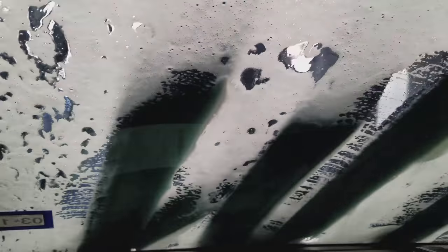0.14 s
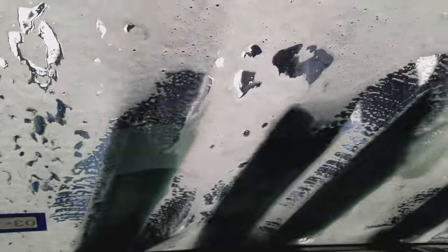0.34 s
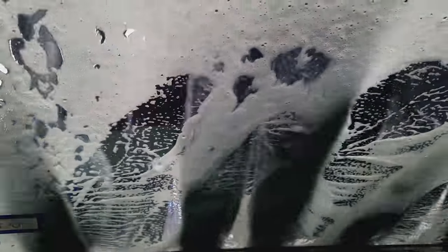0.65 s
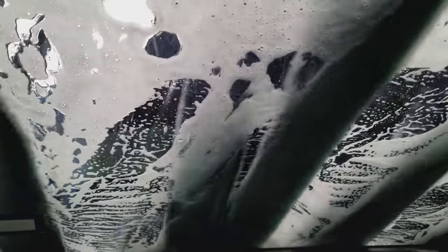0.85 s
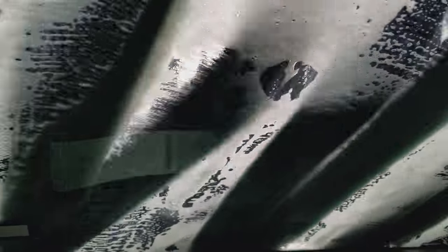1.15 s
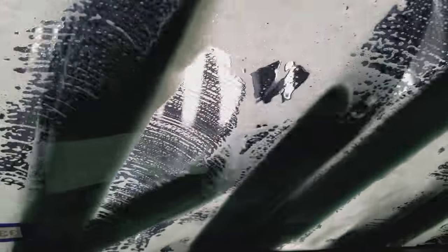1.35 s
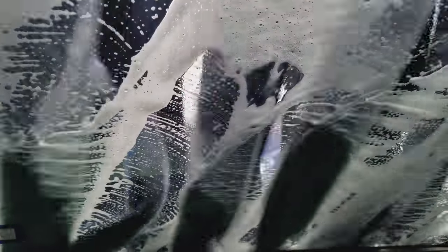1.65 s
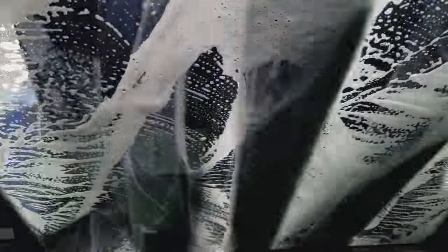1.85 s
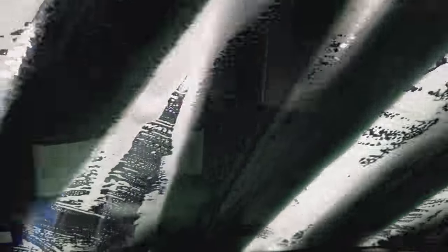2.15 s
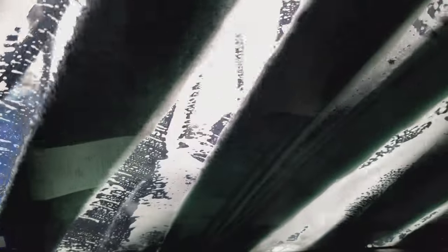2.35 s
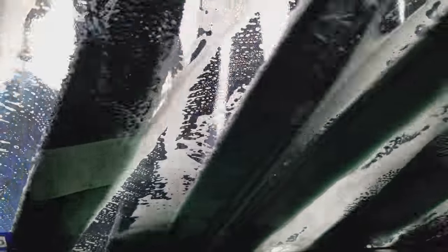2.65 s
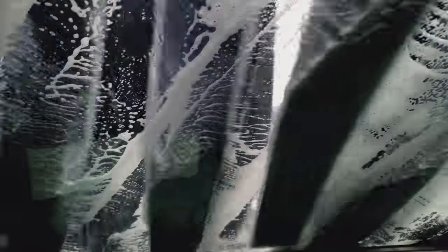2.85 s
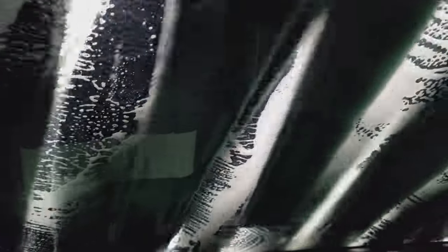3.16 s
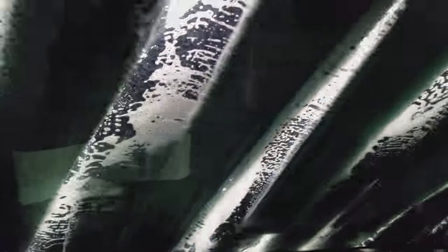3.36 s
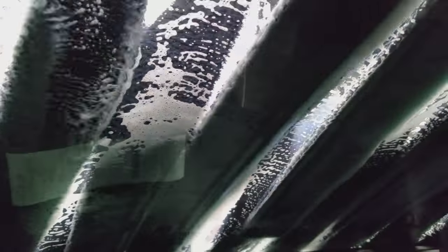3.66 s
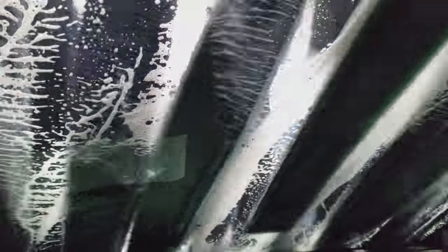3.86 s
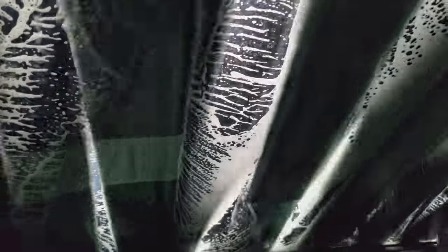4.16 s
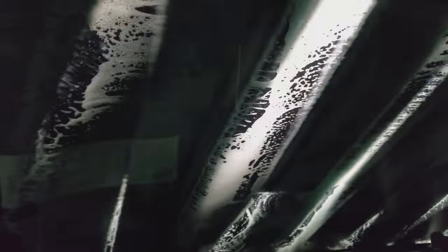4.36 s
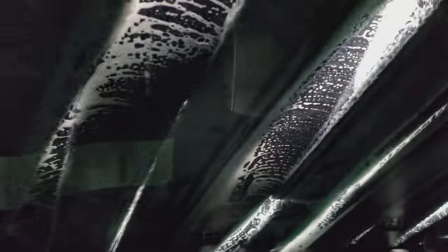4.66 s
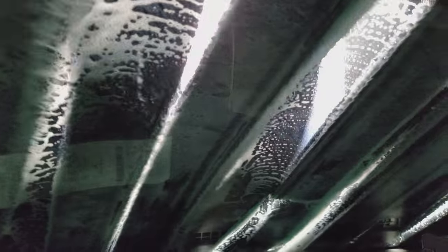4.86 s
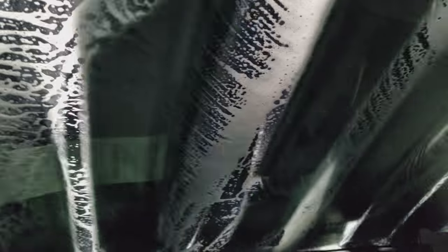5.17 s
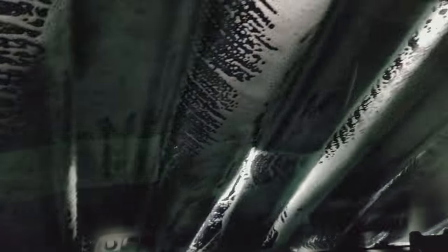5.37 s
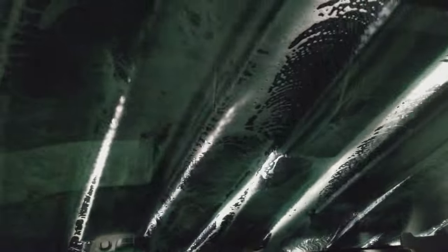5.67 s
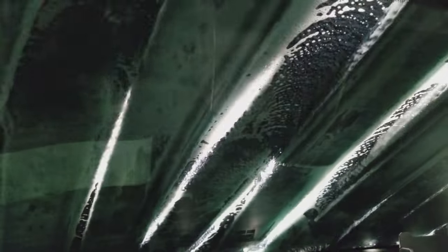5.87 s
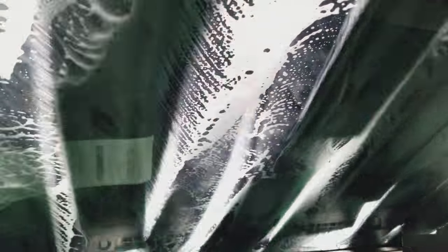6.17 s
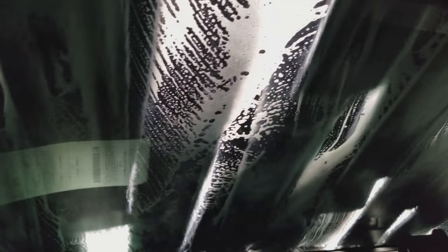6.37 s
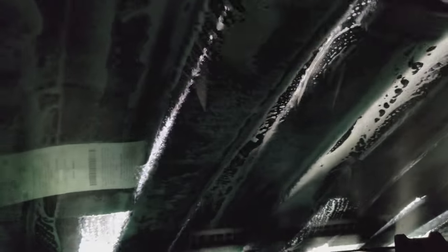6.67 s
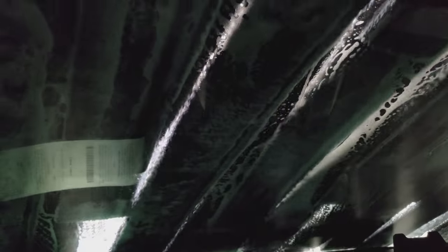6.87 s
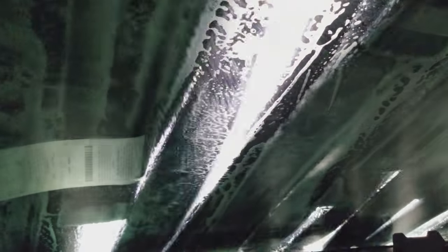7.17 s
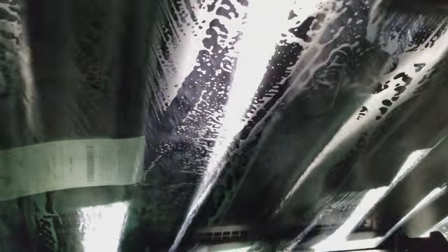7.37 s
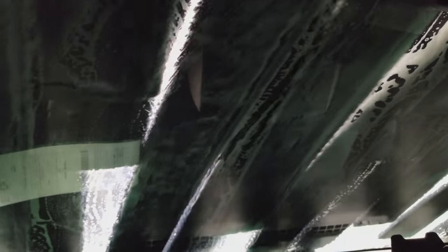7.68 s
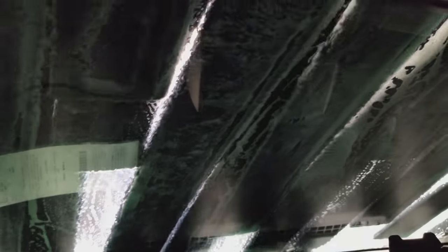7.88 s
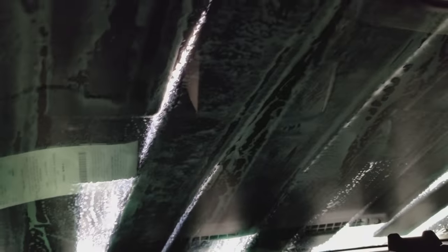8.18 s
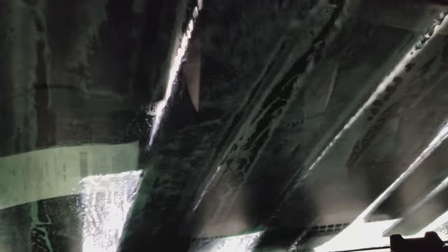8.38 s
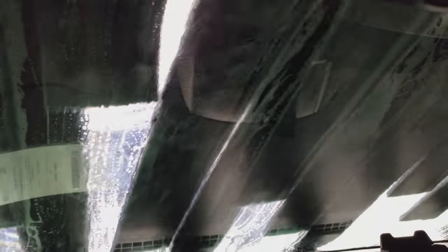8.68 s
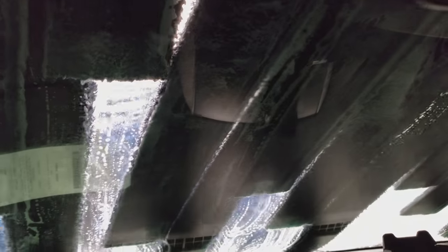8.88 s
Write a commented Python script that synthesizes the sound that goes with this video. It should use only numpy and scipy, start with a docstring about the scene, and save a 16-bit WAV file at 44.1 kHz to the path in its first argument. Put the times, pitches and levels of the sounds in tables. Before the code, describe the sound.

The microphone sits inside a small closed car while an automatic wash works over it for nine seconds. At once heavy wet cloth slaps thud on the roof, deep and dull, at 0.2 and 0.6 s, with lighter blows following. Soft pats drum throughout, over a low cabin rumble, quiet spray and fizzing foam; short watery hisses splash the glass and a few tiny drops tick. A faint, wavering whine near 1 kHz comes and goes until about 3 s. Strong slaps land at 2.2, 2.9 and 4 s, with firmer raps on glass near 3 and 3.9 s. From 4 s cloth drags and scrubs more loudly on the glass, briefly dipping near 4.7 s, where a clear splash falls. Slaps cluster at 5.6-5.9 s; a hard one at 6.8 s precedes a faint squeak until 7 s. Rapid thumps around 7.9 s and booming blows at 8.7 and 8.9 s finish.

```python
"""Inside a closed car in an automatic wash, wet cloth strips swing against the body for nine seconds.
From the start heavy slaps ring the roof, light pats drum, foam fizzes and water splashes on the glass;
a thin whine near 1 kHz comes and goes for three seconds, and now and then a drop ticks or a strip end raps.
As the strips move from the bonnet onto the glass, cloth drags and scrubs louder from about four seconds.
A faint squeak passes near seven seconds; strong slaps fall to the end. Two ports hear it, the right first."""
import sys
import numpy as np
from scipy import signal
from scipy.fft import rfft, irfft, next_fast_len
from scipy.io import wavfile

SR = 44100
rng = np.random.default_rng(int(sys.argv[2]) if len(sys.argv) > 2 else 0)


def dump(signal):
    """Clip the signal to [-1, 1] and save it as 16-bit WAV at the path in sys.argv[1]."""
    limited = np.clip(np.atleast_2d(signal).T, -1, 1)
    pcm = np.round(limited * 32767).astype(np.int16)
    wavfile.write(sys.argv[1], SR, pcm)


N = 398663

# heavy slaps, levels before the two ports: [t/s, peak level/dB, centre f/Hz, glass level over peak/dB,
# contact fading time/s, unrolling rest level over peak/dB, cabin boom peak level/dB]
SLAP_EVENTS = [(.166, -8.5, 157, -16.5, 0.0093, -6, -25), (0.566, -11, 153, -23, 0.0075, 0, -21),
               (.62, -15.5, 150, -7, 0.0076, -9, -36), (.765, -18, 135, -15, 0.01, -4, -45.5),
               (0.859, -19.5, 130, -17, 0.014, -15, -50), (.997, -13, 131, -22, 0.011, -14.5, -31),
               (1.057, -21.5, 94, -28, 0.012, -13, -38), (1.322, -14.5, 90, -47, .0065, -4.5, -32),
               (1.65, -18, 85, 0.5, 0.024, -2.5, -19.5), (1.719, -14.5, 95, -1, 0.0087, -24, -23),
               (1.784, -27.5, 119, 7.5, 0.0057, -13, -29.5), (1.822, -16.5, 124, -26, 0.013, 1.5, -34),
               (2.249, -6.5, 199, -12, 0.02, -13.5, -18.5), (2.411, -11.5, 124, -16.5, 0.011, -6.5, -23),
               (2.632, -22, 109, -38, 0.0071, -18, -44), (2.848, -10.5, 131, -32, 0.012, -7, -27),
               (2.945, -6, 145, -6.5, 0.017, -12.5, -16.5), (3.286, -24, 127, -13, 0.011, 4, -43),
               (3.593, -12.5, 132, -10, 0.0047, -2.5, -31.5), (3.97, -8, 105, -29, 0.0047, -10, -23.5),
               (4.142, -12, 156, -37, 0.0058, -12, -34), (4.252, -27, 157, -50, 0.0077, -16, -42.5),
               (4.538, -13, 126, -25, .01, -2, -44), (5.159, -21.5, 90, -34, .01, -4.5, -16),
               (5.58, -5, 136, -12.5, 0.012, -8, -24.5), (5.634, -7, 106, -18, 0.014, -10.5, -33.5),
               (5.721, -6.5, 168, -15, 0.0074, -25.5, -34), (5.857, -10, 91, -22, 0.0055, -17, -44),
               (6.299, -18, 111, -22, .011, -21, -32), (6.6, -15.5, 150, -32, 0.0068, 3, -31.5),
               (6.762, -3.5, 128, -21, 0.01, -8, -25), (7.086, -10.5, 150, -32, .0066, -4.5, -39.5),
               (7.217, -15, 157, -7, 0.013, -19, -29), (7.38, -14.5, 150, -22, .01, -11.5, -31.5),
               (7.538, -19, 133, -4, .011, -6.5, -33), (7.746, -12.5, 147, -3.5, .01, -3, -23),
               (7.884, -5.5, 197, -9, .006, -6.5, -19.5), (7.908, -6.5, 189, -19, 0.0062, -9, -33.5),
               (7.99, -11, 158, -30, 0.011, -14.5, -19.5), (8.166, -7, 136, -12, 0.017, -8, -31),
               (8.339, -35, 153, -32, .012, -13, -27), (8.667, -3, 147, -10, 0.016, -10.5, -13),
               (8.747, -16, 90, -16, 0.014, -24.5, -44), (8.939, -3, 142.4, -13.5, 0.009, -7, -19)]
# ways each part of the car rings: [f/Hz, width/Hz, level/dB]
ROOF_MODES = [(77, 12.6, -3), (93.9, 20.6, 0), (127.9, 24, 1.5), (154.4, 18.8, 2.5), (188, 31.2, -3.5)]
GLASS_MODES = [(260.2, 50.7, -8), (282.5, 34, -2), (349.8, 65.3, -4.5), (401, 85.4, -7.5), (480, 132, -11),
               (656, 310, -17.5), (992, 320, -19.5)]
BONNET_MODES = [(752, 64, 10.5), (990, 70, 7), (1580, 31, 4.5), (1853, 80, -6), (2297, 130, -3),
                (2820, 100, -1), (3100, 150, -5), (3664, 150, -3)]
# ways the air in the cabin rings: [f/Hz, width/Hz, level/dB]
CABIN_MODES = [(26.2, 26, -9), (40, 4, -15.5), (50, 18, 7.5)]


def amp(db):
    """Turn decibels into gain."""
    return 10 ** (np.asarray(db) / 20)


def rms_one(x):
    """Scale to an rms strength of 1."""
    return x / np.sqrt(np.mean(x ** 2) + 1e-20)


def in_time(rows):
    """Join the points of a time table by straight lines, one value per sample for each column."""
    s, *columns = np.transpose(rows)
    return [np.interp(np.arange(N) / SR, s, column) for column in columns]


def at_hz(points, hz):
    """Read a table of frequency and value on a log-frequency axis."""
    table_hz, values = np.array(points).T
    return np.interp(np.log(hz + 1e-9), np.log(table_hz), values)


def drift(rate):
    """Slow random wandering of rms 1, changing about rate times a second."""
    step = 40   # samples between the slow values
    r = np.exp(-2 * np.pi * rate * step / SR)
    white = rng.standard_normal(N // step + 2002)
    slow = signal.lfilter([1], [1, -2 * r, r * r], white)[2000:]   # skip the filter's start
    return np.interp(np.arange(N) / step, np.arange(len(slow)), rms_one(slow))


def resonate(x, hz, width):
    """One resonance with gain 1 at its top; a narrower width (Hz) rings longer."""
    r = np.exp(-np.pi * width / SR)
    top = (1 - r * r) / 2
    return signal.lfilter([top, 0, -top], [1, -2 * r * np.cos(2 * np.pi * hz / SR), r * r], x + 1e-18)


def panel(x, modes, wander_db=0):
    """A panel rings in several modes of alternating sign; moving cloth damps now one, now another."""
    out = 0
    for k, (hz, width, level_db) in enumerate(modes):
        wander = wander_db * drift(8.2) if wander_db else 0
        out = out + (-1) ** k * amp(level_db + wander) * resonate(x, hz, width)
    return out


def burst(rise_s, decay_s, length_s):
    """Two unrelated noise bursts that swell and fade under one envelope."""
    t = np.arange(round(length_s * SR)) / SR
    envelope = (1 - np.exp(-t / rise_s)) * np.exp(-t / decay_s)
    return rng.standard_normal((2, len(t))) * envelope


def add(out, s, peak_db, x):
    """Lay a two-row event into the mix at time s, both rows with the same peak."""
    at = round(s * SR)
    level = amp(peak_db) * x / np.abs(x).max(axis=1, keepdims=True)
    out[:, at:at + x.shape[1]] += level[:, :N - at]


def slaps():
    """A strip's leading end knocks the roof, the rest unrolls lower; glass and cabin air shake along."""
    rise_s, glass_rise_s, knock_delay_s = .004, .012, .001
    out = np.zeros((2, N))
    knock, push = np.hanning(round(.004 * SR)), np.hanning(round(.012 * SR))
    soft = signal.butter(2, 340, fs=SR, output="sos")   # wet cloth dulls the blow
    for s, peak_db, hz, glass_db, contact_s, rest_db, boom_db in SLAP_EVENTS:
        landing = burst(rise_s, contact_s, 0.16)
        # the glass takes up the blow more gradually
        spreading = np.minimum(np.arange(landing.shape[1]) / (glass_rise_s * SR), 1)
        on_glass = resonate(resonate(landing * spreading, 300, 300), 300, 300)
        add(out, s, peak_db + glass_db, panel(on_glass, GLASS_MODES))
        after_delay = landing[:, round(knock_delay_s * SR):]
        after_delay[:, :len(knock)] += 0.22 * knock   # also changes landing
        on_roof = resonate(signal.sosfilt(soft, landing), hz, 84)
        add(out, s, peak_db, panel(on_roof, ROOF_MODES))
        rest = signal.sosfilt(soft, burst(0.035, 0.035, 0.16))
        add(out, s, peak_db + rest_db, panel(resonate(rest, 0.7 * hz, 64), ROOF_MODES))
        dent = burst(rise_s, 0.035, 0.26)
        dent[:, :len(push)] += 0.17 * push
        add(out, s, boom_db, panel(resonate(dent, 41, 43), CABIN_MODES))
    return out


def shake():
    """Strength with which the car still shakes after each heavy slap; the slaps' powers add up."""
    rise_s, fall_s = 0.0031, 0.055
    kicks = np.zeros(N)
    for s, peak_db, *_ in SLAP_EVENTS:
        kicks[round(s * SR)] = amp(2 * peak_db)
    rise, fall = np.exp(-2 / (SR * np.array([rise_s, fall_s])))
    slow = signal.lfilter([1], [1, -fall], kicks + 1e-18)
    fast = signal.lfilter([1], [1, -rise], kicks + 1e-18)
    return np.sqrt(np.abs(slow - fast))


def raps():
    """A strip end makes a short, firmer contact: the glass rings, with a dull wet crack on top."""
    # strip ends on the glass: [t/s, peak level/dB, crack level over the ring/dB]
    rap_events = [(.102, -33, -2), (0.953, -37, -14), (1.052, -39, -14), (2.076, -32, -8),
                  (1.761, -25, -18), (2.432, -29, -13), (2.953, -18, -16), (3.605, -30, -3),
                  (3.909, -20, -15), (4.027, -23.5, -11), (5.572, -32, -5), (6.125, -25.5, -10),
                  (6.768, -28, -10), (7.176, -29, -14), (7.477, -33, -20), (8.186, -27, -12),
                  (8.425, -28, -14), (8.674, -12.5, -22), (8.769, -35, -13)]
    out = np.zeros((2, N))
    for s, peak_db, crack_db in rap_events:
        contact = burst(0.00046, 0.0025, 0.17)
        ring = panel(resonate(contact, 700, 800), GLASS_MODES[4:])
        crack = resonate(resonate(contact, 1400, 2500), 1400, 2500)
        add(out, s, peak_db, ring)
        add(out, s, peak_db + crack_db, crack)
    return out


def pats(modes, per_s, uneven_db, soft_hz, wander_db=0):
    """Light touches come at random, in clumps; wet cloth is soft, so each is a dulled click on a panel."""
    touches = rng.random((2, N)) < per_s * amp(3 * drift(5)) / SR   # the rate swings around per_s
    sizes = amp(uneven_db * np.minimum(rng.exponential(1, (2, N)), 4))
    signed = sizes * rng.choice([-1, 1], (2, N))
    dull = signal.butter(2, soft_hz, fs=SR, output="sos")
    soft = signal.sosfilt(dull, touches * signed + 1e-18)
    return rms_one(panel(soft, modes, wander_db))


def drag():
    """Cloth sliding on the glass catches in many tiny touches that ring the glass, at rms 1."""
    # glass under sliding cloth: [f/Hz, width/Hz, level/dB]
    drag_modes = [(157.4, 9.2, 12.5), (283, 15, 1), (406, 13.2, 7.5), (447.6, 30.5, 3), (503.5, 43, -4),
                  (581, 20, 0.5), (607.6, 18, 3.5), (743, 60, -10), (927, 39, -6), (1128, 17, -8.5)]
    return pats(drag_modes, per_s=1800, uneven_db=1.0, soft_hz=2980, wander_db=1.6)


def banded_noise(spectrum, low_hz, high_hz, count, together_db, own_db):
    """Neighbouring narrow bands of noise that flicker partly together, partly alone, at rms 1."""
    out = 0
    together = together_db * 3 * np.tanh((drift(24) + 0.95 * drift(30)) / 3)
    white = rng.standard_normal((2, 2, N))
    edges = np.geomspace(low_hz, high_hz, count + 1)
    for k, (low, high) in enumerate(zip(edges, edges[1:])):
        bandpass = signal.butter(2, [low, high], "band", fs=SR, output="sos")
        band = signal.sosfilt(bandpass, white[k % 2])   # neighbours use different noise
        level_db = at_hz(spectrum, np.sqrt(low * high)) + together + own_db * drift(23)
        out = out + amp(level_db) * band
    return rms_one(out)


def scrub():
    """Cloth scrubbing over the glass: noise in the middle range whose bands flicker together."""
    # relative strength of the scrub: [f/Hz, level per Hz/dB]
    scrub_spectrum = [(560, -29), (900, -10), (1300, -5.5), (2100, -14), (2800, -16), (3700, -22),
                      (4500, -27)]
    return banded_noise(scrub_spectrum, 560, 4350, count=9, together_db=2.15, own_db=0.0)


def splashes():
    """Water thrown on the glass: a hiss that starts quickly and dies, finer water brighter."""
    # splashes: [t/s, peak level/dB, treble gain/dB]
    splash_events = [(.06, -43, 10), (.305, -53, -2), (.382, -33.5, 8), (0.488, -34, -7), (.6, -38, 6),
                     (0.679, -32.5, 9), (.795, -38, -5), (.985, -38, 2), (1.069, -35.5, -5),
                     (1.336, -34, -10), (1.554, -34.5, -13), (1.6232, -35, -19), (1.72, -30.5, 7),
                     (1.84, -40, 7), (1.931, -38.5, 3), (2.073, -41, -7), (2.125, -38, -7),
                     (2.263, -37.5, 14), (2.47, -47, -5), (2.5106, -35, -21), (2.6419, -33.5, 10),
                     (2.7052, -31, -4), (3.074, -35, -6), (3.186, -35, 6), (2.895, -33, -5),
                     (3.386, -32.5, -17), (3.93, -45, -4), (4.019, -39, 0), (4.7286, -26.5, 6),
                     (4.8249, -31, 3), (5.4, -36, 9), (5.443, -35.5, 1), (5.506, -33, 14), (5.571, -32, 5),
                     (5.597, -30, 9.5), (5.672, -35, -1), (5.715, -31, 2), (5.776, -39, -4),
                     (5.943, -34, 3), (5.971, -36, -7), (6.203, -34, -9), (6.361, -35, -4), (6.456, -37, 6),
                     (6.602, -48, 0), (6.773, -38, 9), (6.909, -37, -8), (7.162, -31.5, -6),
                     (7.335, -38, 13), (7.37, -36, -3), (7.478, -34, 6), (7.891, -36, -9), (7.99, -40, -6),
                     (8.091, -32, 0), (8.2721, -35, 0), (8.624, -35.5, 8), (8.6667, -25, -19),
                     (8.979, -31, 0)]
    t60_s, bonnet_db, fizz_db = 0.11, 1, -20.5   # t60: time to die by 60 dB
    out = np.zeros((2, N))
    band = signal.butter(2, [700, 4240], "band", fs=SR, output="sos")
    for s, peak_db, treble_db in splash_events:
        water = burst(.005, t60_s / np.log(1000), 0.3)
        hiss = signal.sosfilt(band, water)
        body = signal.lfilter([1], [1, -.8], hiss)   # favours the lower part
        bonnet = amp(bonnet_db) * panel(hiss, BONNET_MODES)
        fine = resonate(resonate(water, 12200, 3000), 12200, 3000)
        treble = resonate(hiss, 6300, 3500) + amp(fizz_db) * fine
        add(out, s, peak_db, body + bonnet + amp(treble_db) * treble)
    return out


def drops():
    """Drops near the microphone: tiny bright ticks, each a very short burst in one resonance."""
    # drops: [t/s, peak level/dB, f/Hz]
    drop_events = [(0.6794, -47, 11900), (0.7257, -37, 11400), (0.7926, -60, 12100), (1.725, -43, 9430),
                   (1.8077, -47, 11620), (2.2682, -53, 10100), (2.7057, -40, 13000), (2.8443, -37.5, 11800),
                   (2.9464, -39, 12500), (4.7292, -54, 11960), (5.5059, -42, 13000), (8.6687, -46, 12100),
                   (8.8318, -47, 11800)]
    t60_s = 0.016
    out = np.zeros((2, N))
    for s, peak_db, hz in drop_events:
        tick = burst(.0003, t60_s / np.log(1000), 0.059)
        add(out, s, peak_db, resonate(tick, hz, 2500))
    return out


def spray():
    """Spray: treble noise whose bands flicker mostly on their own."""
    # relative strength of the spray: [f/Hz, level per Hz/dB]
    spray_spectrum = [(2800, -10.5), (4200, -4.5), (5500, -10.5), (7000, 0.5), (7800, -16), (9000, -30)]
    return banded_noise(spray_spectrum, 3360, 8440, count=4, together_db=1.15, own_db=2.3)


def fizz():
    """Foam fizz: flickering noise at the very top of the treble."""
    # relative strength of the fizz: [f/Hz, level per Hz/dB]
    fizz_spectrum = [(9000, -17), (10500, -0.5), (12200, 3.5), (13200, -3.5), (14200, -7.5), (15600, -14)]
    return banded_noise(fizz_spectrum, 8100, 17000, count=6, together_db=0.45, own_db=1.5)


def tone(rows, waver):
    """A thin tone wavering in strength and phase, separately in each row, silent outside its table."""
    hz, level_db = in_time(rows)
    t = np.arange(N) / SR
    turn = 2 * np.pi * np.cumsum(hz) / SR
    sides = []
    for side in range(2):
        in_step = (1 + waver * drift(45)) * np.cos(turn)
        sides.append(in_step + waver * drift(45) * np.sin(turn))
    sounding = (t < rows[-1][0]) * (t >= rows[0][0])
    return amp(level_db) * sounding * np.array(sides)


def squeak():
    """Cloth squeaking faintly on the glass: one wavering high tone."""
    # squeak, level before the wavering: [t/s, f/Hz, level/dB]
    squeak_curve = [(6.75, 4180, -78), (6.78, 4200, -63), (6.81, 4190, -64), (6.83, 4130, -70),
                    (6.86, 4130, -54), (6.9, 4100, -63), (6.93, 4160, -57), (6.97, 4100, -63),
                    (7.02, 4160, -59), (7.06, 4160, -80)]
    return tone(squeak_curve, 0.76)


def whine():
    """A thin whine near 1 kHz that comes and goes: a tone that mostly wavers."""
    # whine, level of each wavering part: [t/s, f/Hz, level/dB]
    whine_curve = [(0, 985, -43), (.1, 951, -66), (.16, 966, -48), (.52, 968, -45), (.6, 996, -66),
                   (.8, 1000, -56), (.9, 1050, -74), (2.09, 1014, -75), (2.125, 1010, -51),
                   (2.17, 1000, -43), (2.21, 1020, -77), (2.6, 995, -59), (2.95, 1033, -47),
                   (3.2, 1010, -85)]
    waver = 1.7
    return tone(whine_curve, waver) / waver


def lulls():
    """Gain of the wash noise: its level dips briefly and returns, in straight lines in dB."""
    # lulls: [t/s, level change/dB, time from the middle to half the change/s]
    lull_events = [(.24, -2.5, 0.024), (.56, -1, 0.017), (.76, -4.5, 0.029), (0.92, -3.5, 0.026),
                   (1.3, -4.5, 0.02), (1.43, -2.5, 0.063), (2.02, -6, 0.081), (2.2, -5.5, 0.049),
                   (2.36, -6, 0.048), (3.7, -6, 0.0083), (4.69, -6.5, 0.013), (4.8, -1, 0.015),
                   (5.23, -3, 0.019), (5.53, 0.5, 0.02), (5.93, -4.5, 0.02), (6.33, -3, 0.034),
                   (7.718, -7.5, 0.018), (8.58, -5, 0.029)]
    t = np.arange(N) / SR
    total_db = 0
    for s, depth_db, half_s in lull_events:
        total_db = total_db + np.interp(t, [s - 2 * half_s, s, s + 2 * half_s], [0, depth_db, 0])
    return amp(total_db)


def ports(pair):
    """The left port hears a late copy of the right, plus the cabin's diffuse sound, more in the treble."""
    # likeness of the two ports: [f/Hz, share of sound common to both (0 to 1)]
    common_share = [(30, .995), (60, .94), (160, .945), (270, .92), (500, .64), (1100, .6), (2000, .4),
                    (4000, .25), (16000, .1)]
    # balance of the two ports: [f/Hz, left level over right/dB]
    balance = [(40, 0), (70, 1), (130, 1), (290, -1.5), (640, -.5), (1410, 0), (3100, -2), (6820, -6.5),
               (15000, -4.5)]
    left_lag_s, standing_below_hz = .00043, 314
    size = next_fast_len(N + 1024)
    hz = np.arange(size // 2 + 1) * SR / size
    direct, diffuse = rfft(pair, size)
    shared = np.clip(at_hz(common_share, hz), 0, 1)
    tilt = amp(at_hz(balance, hz) / 2)
    # standing waves reach both ports in step, so the lag shrinks in the bass
    lag_s = left_lag_s * hz ** 2 / (hz ** 2 + standing_below_hz ** 2)
    late = direct * np.exp(-2j * np.pi * hz * lag_s)
    left = shared * late + np.sqrt(1 - shared ** 2) * diffuse
    return irfft([left * tilt, direct / tilt], size)[:, :N]


def scene():
    """All sources pass through the two ports, except the whine, which joins both without a lag."""
    # cloth at work, levels before shaking, lulls and ports: [t/s, roof pats level/dB, glass pats level/dB,
    # scrub level/dB, spray level/dB, foam fizz level/dB, cabin boom level/dB]
    cloth = [(0.0, -30, -36.5, -48, -56.5, -66, -39), (0.45, -36, -42, -49, -57.5, -66, -34.5),
             (0.85, -27.5, -39, -50, -57, -63.5, -38), (1.53, -38, -40, -50, -58.5, -68.5, -33),
             (1.79, -25, -33, -52, -60.5, -68, -33.5), (2.06, -32.5, -33.5, -51.5, -57.5, -69.5, -35),
             (2.47, -29.5, -40.5, -53, -59.5, -71, -39), (2.79, -32, -32, -45.5, -54.5, -65.5, -40.5),
             (3.62, -33, -38, -43, -60, -70.5, -43), (3.98, -27, -30.5, -42.5, -56.5, -68, -43),
             (4.15, -27, -31, -42.5, -58, -68, -33.5), (5.11, -24, -32.5, -45, -57.5, -67.5, -30),
             (5.39, -28, -32, -46, -58.5, -66.5, -30), (5.76, -22.5, -30.5, -42.5, -53, -64.5, -29),
             (6.37, -25.5, -30, -41.5, -57, -65.5, -30), (7.25, -22.5, -29.5, -42, -56, -65.5, -32),
             (7.43, -25, -32, -41.5, -56, -63.5, -32), (7.73, -22.5, -29.5, -41.5, -54.5, -64, -33),
             (8.03, -24.5, -30, -43.5, -55.5, -66, -38.5), (8.36, -22.5, -30.5, -43.5, -55.5, -66, -40.5),
             (8.63, -22.5, -29.5, -40, -55.5, -67, -33), (9.04, -32, -30.5, -45.5, -56.5, -66.5, -36.5)]
    # strips moving from the bonnet onto the glass: [t/s, drag level over scrub/dB, bonnet level over scrub/dB]
    reach = [(1.0, 8.5, 2), (2.4, 14, 5.5), (3.55, 5.5, -1.5), (4.1, 16.5, -12), (4.9, 14.5, -18),
             (5.6, 14.5, -8), (7.0, 11.5, -7.5), (9.04, 14.5, -5)]
    roof_db, glass_db, scrub_db, spray_db, fizz_db, boom_db = in_time(cloth)
    drag_over_db, bonnet_over_db = in_time(reach)

    # the shaking car strengthens the glass pats and the rubbing
    shaking = shake()
    patting = np.hypot(amp(glass_db), amp(-19) * shaking)
    rubbing = np.hypot(amp(scrub_db), amp(-57.5) * shaking)

    wash = amp(roof_db) * pats(ROOF_MODES, per_s=250, uneven_db=2.5, soft_hz=250)
    wash += patting * pats(GLASS_MODES, per_s=500, uneven_db=2.0, soft_hz=2050)
    wash += amp(scrub_db + drag_over_db) * drag()
    bonnet = pats(BONNET_MODES, per_s=3000, uneven_db=3.0, soft_hz=4470, wander_db=2.2)
    wash += rubbing * amp(bonnet_over_db) * bonnet
    wash += rubbing * scrub()
    wash += amp(spray_db) * spray()
    wash += amp(boom_db) * pats(CABIN_MODES, per_s=170, uneven_db=-2.0, soft_hz=149)

    dips = lulls()
    steady = dips * wash + dips ** .4 * amp(fizz_db) * fizz()   # the fizz dips less
    hits = slaps() + raps() + splashes() + drops()
    return ports(steady + hits + squeak()) + whine()


def record(dry):
    """The microphone ports have a dip in the upper treble; peaks are rounded, the top is cut."""
    dipped = dry - 0.79 * resonate(dry, 8460, 3130)
    rounded = 1.3 * np.tanh(dipped / 1.3)
    top_cut = signal.ellip(12, .5, 70, 15850, fs=SR, output="sos")
    return signal.sosfilt(top_cut, rounded)


dry = scene()
out = record(dry)
dump(out)
```